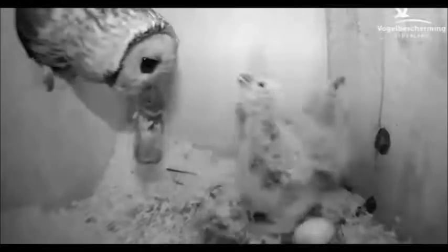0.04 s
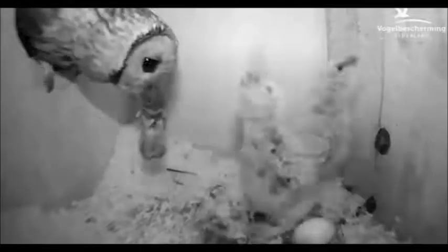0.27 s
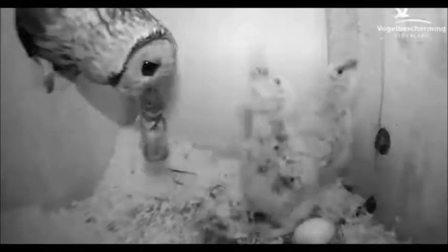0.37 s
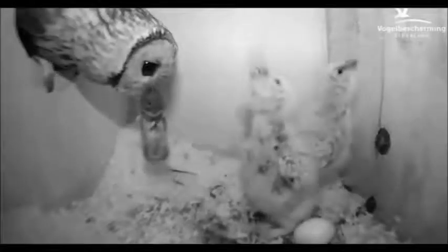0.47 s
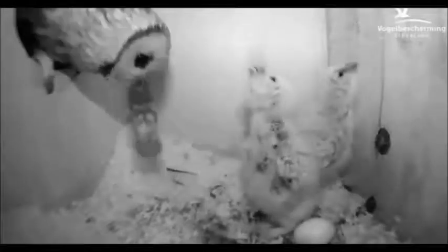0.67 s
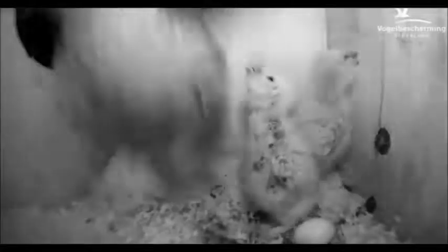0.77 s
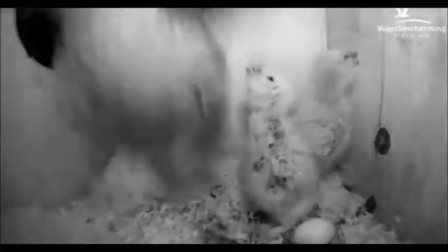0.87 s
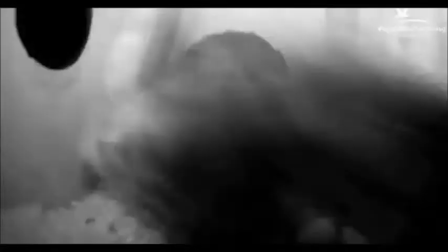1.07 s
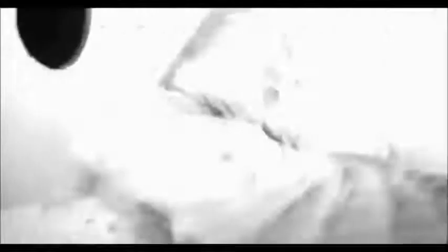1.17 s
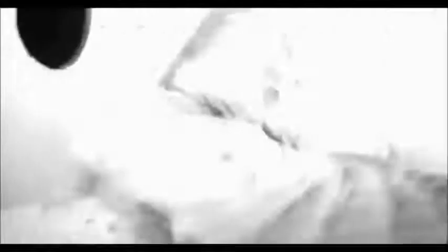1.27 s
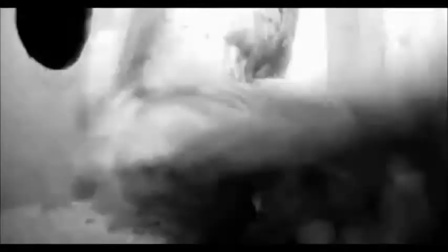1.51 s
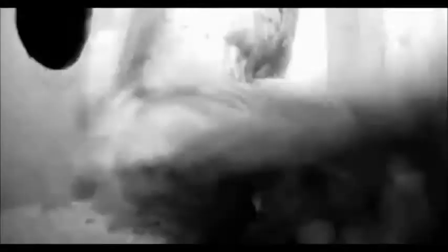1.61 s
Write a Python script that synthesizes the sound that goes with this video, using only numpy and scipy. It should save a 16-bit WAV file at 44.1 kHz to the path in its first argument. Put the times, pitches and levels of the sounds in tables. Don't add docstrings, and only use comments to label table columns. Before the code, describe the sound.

A violent thump dominates at about 0.3 s, clipped and cracking at a close microphone inside a wooden nest box. Before it come a soft owl coo, quick chick twitters, claw scrapes and knocks from 0.16 s. Litter rustles and a coo trails to 0.47 s. Then quiet hum and hiss, a short coo at 0.67, small knock at 0.93, faint twitters from 0.9 and a low coo near 1.45.

```python
import sys
import numpy as np
from scipy import signal
from scipy.fft import rfft, irfft
from scipy.io import wavfile
from scipy.ndimage import uniform_filter1d

SR = 44100
rng = np.random.default_rng(int(sys.argv[2]) if len(sys.argv) > 2 else 0)


def log_audio(samples):
    frames = np.atleast_2d(samples).T
    limited = np.clip(frames, -1, 1)
    pcm = np.round(limited * 32767).astype(np.int16)
    wavfile.write(sys.argv[1], SR, pcm)


def elevation(decibels):
    levels = np.asarray(decibels, float)
    return 10 ** (levels / 20)


N = 72765


def curve(t, table, col):
    table = np.array(table, float)
    return np.interp(t, table[:, 0], table[:, col])


def colour(x, points):
    points = np.array(points, float)
    hz = np.maximum(np.fft.rfftfreq(len(x), 1 / SR), 1)
    gain_db = np.interp(np.log(hz), np.log(points[:, 0]), points[:, 1])
    return irfft(rfft(x) * elevation(gain_db), len(x))


def unit(x):
    return x / np.sqrt(np.mean(x ** 2))


def noise():
    return rng.standard_normal(N)


def walk(rate_hz):
    k = int(SR / rate_hz)
    return unit(uniform_filter1d(uniform_filter1d(noise(), k), k))


def swell(t, start, length, peak=0.66):
    u = np.clip((t - start) / length, 0, 1)
    bend = np.log(.5) / np.log(np.clip(peak, .05, .9))
    return np.sin(np.pi * u ** bend) ** 2


def ring(x, hz, width_hz):
    return signal.lfilter(*signal.iirpeak(hz, hz / width_hz, SR), x)


def rasp(depth, hz):
    return 1 + depth * unit(ring(noise(), hz, hz))


# pitch_hz, level_db (rms)
MAINS_HUM = [(50, -59), (150, -75)]
# pitch_hz, level_db (per Hz)
HISS_SPECTRUM = [(20, -16), (45, -0.5), (193, -23.5), (1280, -33.5), (1770, -32), (3320, -31),
                 (4500, -45.5)]


def hum_and_hiss(t):
    hum = sum(np.sqrt(2) * elevation(db) * np.sin(2 * np.pi * hz * t) for hz, db in MAINS_HUM)
    hum = hum * elevation(1.6 * walk(12))
    hiss = unit(colour(noise(), HISS_SPECTRUM))
    return hum + hiss * elevation(-61.5 + 1.2 * walk(10))


# time_s, level_db
LITTER_STIR = [(0, -48.5), (.06, -55), (.16, -56.5), (.3, -39), (.4, -52), (.47, -56.5), (.53, -71.5),
               (.63, -79), (.72, -67.5), (.84, -68.5), (.92, -56), (.97, -82), (1.38, -71), (1.45, -60),
               (1.53, -79.5)]
# pitch_hz, level_db (per Hz)
LITTER_SPECTRUM = [(35, -17), (60, 0.5), (300, -4), (1370, -18.5), (1960, -25.5), (2810, -23.5),
                   (3430, -23), (4500, -35.5)]


def litter(t):
    grains_per_s, spread_db = 810, 5
    hit, size = rng.random((N, 2)).T
    grains = (hit < grains_per_s / SR) * elevation(-spread_db * np.log(size + 1e-9)) * noise()
    bed = unit(grains) + 2.1 * noise()
    stir_db = curve(t, LITTER_STIR, col=1) + 3.5 + 1.5 * walk(31)
    return unit(colour(bed, LITTER_SPECTRUM)) * elevation(stir_db)


# start_s, length_s, pitch_hz, level_db (peak)
WING_BEATS = [
    (0.043, 0.12, 43, -41.5),
    (0.199, 0.077, 45.05, -31.5),
    (0.412, 0.051, 90.7, -44),
    (1.291, 0.091, 79.2, -46),
    (1.415, 0.041, 70.7, -42),
]


def flaps(t):
    out = np.zeros(N)
    for start, length, hz, db in WING_BEATS:
        out += elevation(db) * swell(t, start, length, 0.26) * np.sin(2 * np.pi * hz * (t - start))
    return out


# start_s, length_s, level_db
BOARD_PATTERS = [(.165, .02, -52), (.2005, .012, -33), (.21, .016, -37), (.238, .008, -44),
                 (.335, .025, -44), (.42, .04, -50)]


def boards(t):
    hz, width_hz = 850, 350
    effort = sum(elevation(db) * swell(t, start, length, 0.56) for start, length, db in BOARD_PATTERS)
    return effort * unit(ring(ring(noise(), hz, width_hz), hz, width_hz))


# start_s, length_s, level_db
CLAW_SCRAPES = [(0.0025, 0.037, -51.5), (0.165, 0.034, -40.5), (0.195, 0.011, -42.5), (0.091, 0.14, -56),
                (.21, 0.061, -60), (0.502, 0.18, -66), (0.673, 0.092, -67), (0.727, .1, -65),
                (0.44, 0.061, -53.5), (.9, 0.037, -60), (0.81, 0.22, -66), (0.834, 0.02, -67),
                (1.444, 0.0086, -52.5), (1.447, 0.0177, -66.5)]
# start_s, length_s, level_db
CLAW_SKIDS = [(.281, .012, -41), (.2865, .003, -34), (.2965, .007, -25), (.302, .003, -29),
              (.305, .005, -19), (.308, .002, -15), (.311, .008, -28), (.324, .004, -33), (.328, .02, -42),
              (.3465, .005, -35), (.3905, .004, -43), (.9345, .003, -54)]
# pitch_hz, level_db
CLAW_SPECTRUM = [(1200, -8.5), (2000, -15.5), (2500, -6.5), (3200, -0.5), (3800, -9), (4400, -13)]


def claws(t):
    effort = sum(elevation(db) * swell(t, start, length, 0.22) for start, length, db in CLAW_SCRAPES + CLAW_SKIDS)
    scratch = noise() * elevation(2.2 * walk(330))
    return effort * unit(colour(scratch, [(6.7, -44.5)] + CLAW_SPECTRUM + [(20000, -58)]))


# start_s, length_s, start_pitch_hz, end_pitch_hz, level_db
TWITTERS = [(0.112, 0.035, 2780, 3623, -42), (0.143, 0.034, 3420, 3855, -44.5),
            (0.265, 0.013, 3225, 3694, -46), (0.893, 0.013, 2406, 2400, -56),
            (0.955, 0.019, 2800, 1725, -53.5), (0.984, 0.021, 2200, 3480, -53),
            (1.116, 0.013, 2187, 3060, -54), (1.19, 0.028, 2680, 1570, -50),
            (1.223, 0.019, 2080, 3185, -54), (1.292, .02, 2884, 1513, -51.5),
            (1.330, 0.014, 2210, 3020, -53.5), (1.414, .016, 2176, 1700, -55.5),
            (1.446, 0.017, 2590, 3900, -64), (1.499, 0.022, 2416, 1840, -56),
            (1.538, 0.018, 2343, 3450, -56), (1.591, 0.012, 2700, 1870, -54.5),
            (1.508, 0.0098, 4100, 3840, -56.5), (1.596, 0.0078, 4100, 3740, -57),
            (0.262, 0.028, 3020, 3450, -54.5)]
# pitch_hz, width_hz, level_db
BOX_RESONANCES = [(1690, 350, -6), (2284, 270, 3.5), (2700, 270, -1.5), (2970, 130, -1), (3500, 170, -8.5),
                  (3830, 310, -8)]


def chicks(t):
    voice = np.zeros(N)
    jitter = 1 + .03 * walk(500)
    breath = elevation(-17) * unit(ring(noise(), 3200, 1800))
    for start, length, hz0, hz1, db in TWITTERS:
        hz = hz0 + (hz1 - hz0) * np.clip((t - start) / length, 0, 1) ** .6
        phase = 2 * np.pi * np.cumsum(hz * jitter) / SR
        tone = np.sin(phase) + elevation(-22) * np.sin(2 * phase)
        voice += elevation(db) * swell(t, start, length, 14.3 * length) ** 0.62 * (tone + breath)
    voice *= rasp(.5, 280)
    box = np.zeros(N)
    for k, (hz, width_hz, db) in enumerate(BOX_RESONANCES):
        box += (-1) ** k * elevation(db) * ring(voice, hz, width_hz)
    return elevation(5.5) * box


# time_s, pitch_hz, level_db
ADULT_COOS = [
    [(-.01, 682, -33), (.018, 719, -42.5), (.034, 630.6, -41.5), (.046, 727, -44.5), (.056, 790, -48.5),
     (.063, 835, -55), (.07, 860, -67)],
    [(.33, 698, -30.5), (.345, 710, -39), (.355, 713, -30), (.369, 771.6, -39.5), (.405, 729.4, -34),
     (.423, 706, -32.5), (.437, 671, -39.5), (.455, 702, -45), (.47, 664, -60)],
    [(.645, 750, -67), (.657, 756, -41), (.667, 710, -37), (.681, 714.6, -34), (.691, 734, -50.5),
     (.702, 728, -56)],
    [(1.05, 706, -56), (1.06, 723, -50.5), (1.07, 708.4, -47), (1.084, 699.3, -49), (1.132, 679.4, -66.5),
     (1.15, 733, -48.5), (1.158, 730, -62), (1.18, 707, -74)],
    [(1.412, 755, -56), (1.424, 725, -44), (1.436, 618, -44), (1.46, 615.4, -40.5), (1.478, 597, -43),
     (1.488, 702, -49), (1.508, 703, -49), (1.53, 749, -68)],
]
# level_db, start_s, length_s
COO_OCTAVES = [(-62.5, -.02, 0.12), (-64.5, 0.355, 0.072), (-60.5, .65, 0.041), (-58.5, 1.045, 0.12),
               (-60.5, 1.425, 0.081)]
# start_s, length_s, then level_db of 0.5, 1.5 and 2.5 times the pitch
HALF_PITCH = [(1.074, 0.067, -55, -59, -74), (-.005, 0.055, -55, -54, -59.5),
              (.335, 0.098, -61.5, -55, -61.5), (1.15, 0.054, -61, -75, -82)]
# start_s, length_s, pitch_hz, level_db
ADULT_PIPS = [(0.46, 0.055, 725, -49.5), (0.529, 0.032, 717, -65), (0.702, 0.03, 726, -43),
              (0.757, 0.024, 743, -46), (0.808, 0.035, 822, -60), (1.173, 0.046, 860, -61.5),
              (1.227, 0.028, 850, -67), (1.581, 0.054, 841, -69.5)]


def adult(t):
    coos, pips = np.zeros(N), np.zeros(N)
    wobble, flutter = 1 + .007 * walk(69), elevation(1.3 * walk(170))
    halved = [sum(elevation(row[2 + k]) * swell(t, row[0], row[1], 0.59) for row in HALF_PITCH) for k in range(3)]
    edge_s = .008
    for coo, (db, start, length) in zip(ADULT_COOS, COO_OCTAVES):
        phase = 2 * np.pi * np.cumsum(curve(t, coo, col=1) * wobble) / SR
        on = np.clip(np.minimum(t - coo[0][0] + .001, coo[-1][0] - t) / edge_s, 0, 1)
        overtones = np.sin(2 * phase) + elevation(-14) * np.sin(4 * phase)
        octave = elevation(db) * swell(t, start, length, 0.36) ** .5 * overtones
        croak = sum(gain * np.sin((k + .5) * phase) for k, gain in enumerate(halved))
        coos += on * (elevation(curve(t, coo, col=2)) * np.sin(phase) + octave + croak)
    for start, length, hz, db in ADULT_PIPS:
        pips += elevation(db) * swell(t, start, length, 0.32) ** 1.13 * np.sin(2 * np.pi * hz * t)
    throat = ring(ring(pips * rasp(.6, 77.3), 910, 750), 800, 750)
    return np.sqrt(2) * (coos * flutter + throat)


# start_s, level_db (peak), fade_s
CASE_CRACKS = [(.2995, -64, .012), (.3085, -48, .001), (.311, -48, .001), (.313, -63, .02),
               (.319, -60, .003), (.324, -35, .0005), (.328, -53, .0008), (.325, -63, .011)]


def cracks(t):
    fade = np.zeros(N)
    for start, db, fade_s in CASE_CRACKS:
        fade += elevation(db) * (t > start) * np.exp(-np.maximum(t - start, 0) / fade_s)
    return fade * unit(colour(noise(), [(3500, -27), (5000, -5), (7300, 0.0), (15000, -31.5)]))


# start_s, level_db (peak), pitch_hz (of the push), direction (sign), ring_cycles
WALL_KNOCKS = [(0.163, -30.5, 61.4, -1, 3.1), (0.193, -24.5, 92, -1, 2.8), (0.2029, -18.5, 230, 1, 4.7),
               (0.2064, -24, 123, 1, 0.34), (0.218, -21, 109.4, -1, 2.5), (0.227, -30, 203, 1, 2),
               (0.24, -31.5, 151.1, -1, 1.2), (0.259, -31, 82, -1, 7.9), (0.345, -22, 121, 1, 1.6),
               (0.388, -32.5, 151, 1, 1.4), (0.927, -33, 96.5, -1, 1.04)]
# start_s, level_db (peak), pitch_hz (of the push), direction (sign), ring_cycles
LANDING_BLOWS = [(.2828, -11, 200, -1, .7), (.2842, -12, 220, -1, .9), (.2953, -8, 160, 1, 2.2),
                 (.3022, -13, 700, -1, .8), (.3029, 1.5, 230, 1, .9), (.3066, -12, 700, 1, 1),
                 (.3076, -4, 700, -1, 2.6), (.309, 4.5, 170, -1, 1.1), (.316, -17, 50, 1, 1.2),
                 (.3237, -2, 700, 1, 1), (.3243, 3.5, 420, -1, .55)]


def knocks(t):
    push, rattle = np.zeros(N), np.zeros(N)
    for start, db, hz, direction, cycles in WALL_KNOCKS + LANDING_BLOWS:
        turn = np.maximum(t - start, 0) * hz
        fade = elevation(db) * np.exp(-turn / cycles * 3.18)
        push += np.sign(direction) * fade * np.sin(2 * np.pi * turn)
        rattle += fade * np.minimum(turn * 8, 1)
    wood = unit(colour(noise(), [(150, -10.5), (500, -0.5), (1100, -8.5), (2000, -37.0), (5000, -44.5)]))
    return push + elevation(-20) * rattle * wood


def scene():
    t = np.arange(N) / SR
    air = adult(t) + chicks(t) + knocks(t) + flaps(t) + claws(t) + litter(t) + hum_and_hiss(t) + boards(t)
    air = air - 0.82 * ring(air, 2000, 790)
    band = signal.cheby2(10, 50, 4750, fs=SR, output="sos")
    return (signal.sosfilt(band, air) + cracks(t))[None]


def roll_off(x):
    return signal.sosfilt(signal.butter(12, 15700, fs=SR, output="sos"), x)


def record(dry):
    clip_at, knee = .455, 8
    x = dry / (1 + np.abs(dry / clip_at) ** knee) ** (1 / knee)
    x = x + elevation(-96) * rng.standard_normal(dry.shape)
    x = signal.sosfilt(signal.butter(1, 18, "high", fs=SR, output="sos"), x)
    return roll_off(x)


dry = scene()
out = record(dry)
log_audio(out)
```